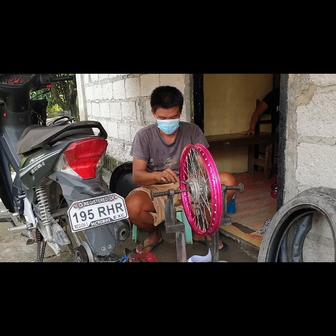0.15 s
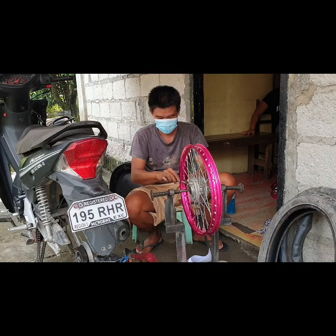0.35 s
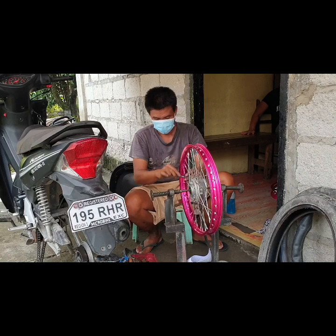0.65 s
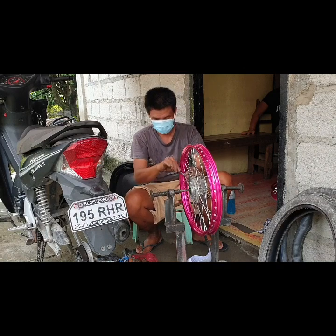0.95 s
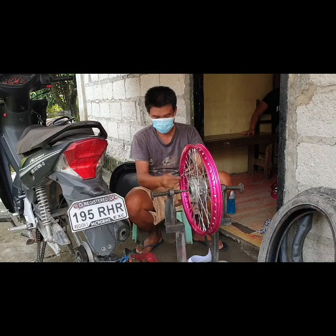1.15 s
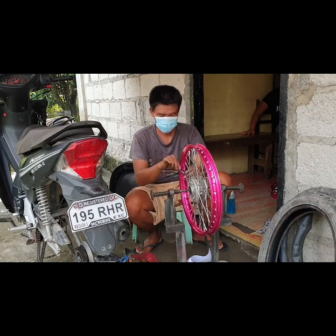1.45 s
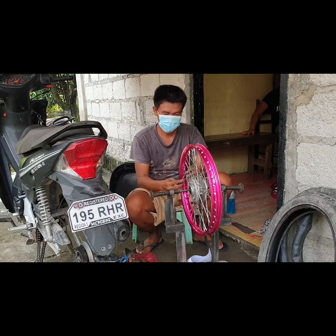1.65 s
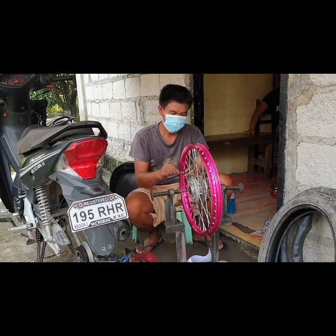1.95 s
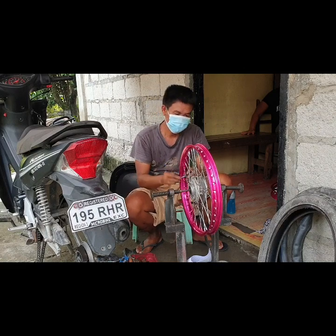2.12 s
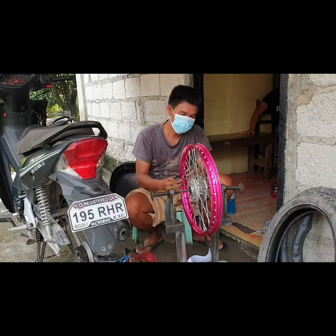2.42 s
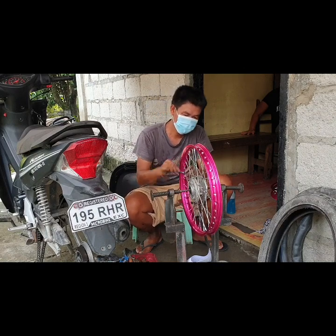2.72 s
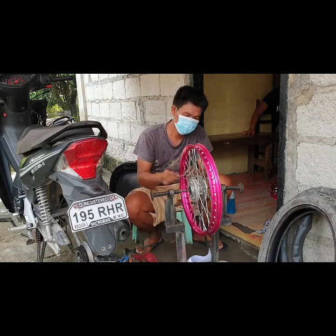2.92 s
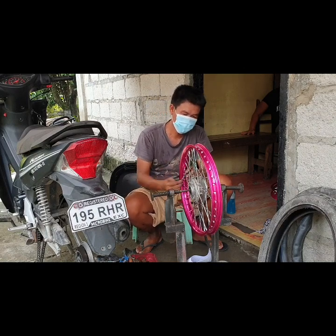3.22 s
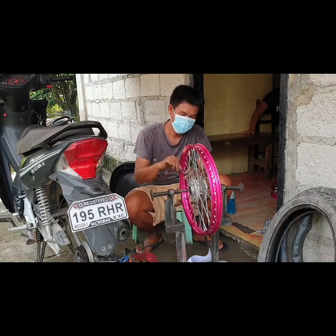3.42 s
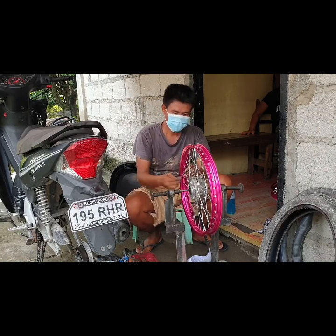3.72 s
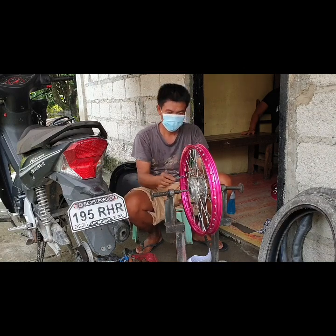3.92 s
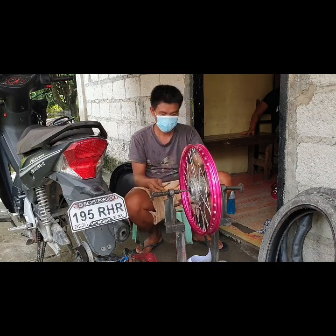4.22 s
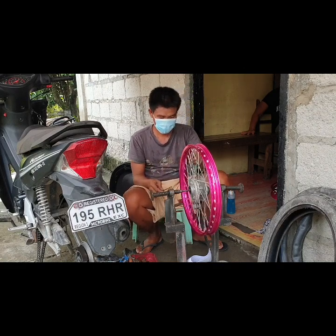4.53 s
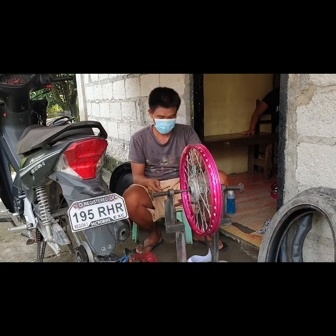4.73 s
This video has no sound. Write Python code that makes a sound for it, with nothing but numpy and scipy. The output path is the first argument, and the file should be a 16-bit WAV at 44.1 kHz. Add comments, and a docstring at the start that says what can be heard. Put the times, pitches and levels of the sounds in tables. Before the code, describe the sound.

Steel spokes clink and knock against a wheel rim, ringing briefly, while a small engine throbs down the street and fades.

```python
"""A steel tool and loose spokes clink and knock on a motorcycle wheel being laced in a doorway.
Each contact cracks and rings the rim and the whole web of spokes; single spokes sing on, beating,
and the loose ones tremble in their holes. Down the street a single-cylinder engine throbs, one
boom and puff per firing, and fades away. Behind it lie rumble, traffic and a thin hiss;
far off, birds hoot and whistle."""
import sys
import numpy as np
from scipy import signal
from scipy.fft import rfft, irfft, next_fast_len
from scipy.io import wavfile
from scipy.ndimage import map_coordinates

SR = 44100
rng = np.random.default_rng(int(sys.argv[2]) if len(sys.argv) > 2 else 0)


def dump_mix(stems):
    """Bounce the given channels to the path in sys.argv[1] as a 16-bit WAV at rate SR."""
    frames = np.atleast_2d(stems).T  # one column per channel
    limited = np.clip(frames, -1, 1)  # hard clip at full scale
    pcm = np.round(limited * 32767).astype(np.int16)
    wavfile.write(sys.argv[1], SR, pcm)


N = 214612
TOP_HZ = 15750  # top of the mix

# Light contacts that each ring a spoke: loose spokes clinking together, and the tool touching, seating on a
# nipple or rebounding: t/s, level/dB, rim clank/dB, brightness/dB, spoke note f/Hz, note level/dB
CLINKS = [(0.07, -34, -9, 13, 6196, -44), (0.2019, -46, -12, 6, 3084, -68),
          (.403, -44.5, -5.5, 16, 2770, -58), (.425, -33.5, -10.5, 14.5, 7350, -37),
          (0.477, -35, -13.5, 6, 3084, -45), (0.5593, -51, -2, 10, 3084, -58),
          (.612, -38, 1.5, 7, 1650, -50.5), (1.019, -46.5, -15, 11, 2310, -70),
          (1.09, -43.5, -3.5, 11, 1674, -45), (1.421, -37.5, -3, 10, 2150, -51),
          (1.505, -39.5, -3, 9.5, 4306, -56), (1.543, -39, -0.5, 7.5, 2200, -50),
          (1.834, -43, 0.5, 12.5, 2770, -48), (1.984, -39, 1.5, 11, 2760, -45),
          (2.2482, -40.5, 1, 9, 1790, -48), (2.6369, -35, -0.5, 10, 2353, -42),
          (2.648, -39.5, -0.5, 9, 2350, -39), (3.033, -36.5, -3, 13, 2340, -38),
          (3.058, -38, 1, 4, 2494, -42), (3.188, -37, 5, 4.5, 2354, -39),
          (3.4424, -37, 3.5, 10.5, 2656, -38), (3.479, -37.5, -3, 9, 2304, -42),
          (4.059, -38.5, -5, 10, 1570, -40), (4.0895, -35.5, -6.5, 9, 5500, -32.5),
          (4.5112, -60, 1, 17.5, 5431, -62)]
# Tool on rim: the six columns of CLINKS, then short clank f/Hz, short clank level/dB
KNOCKS = [(1.1202, -39, -4.5, 5, 2180, -38.5, 1740, -25), (1.9451, -33.5, -5, 4.5, 3493, -46, 1840, -39),
          (2.2175, -46, 7, 9.5, 2790, -42, 1990, -28.5), (2.341, -33.5, -4, 5.5, 1763, -29, 1880, -17),
          (2.358, -36.5, 4, -1, 1827, -29.5, 1800, -25), (2.3904, -32, 1, 4.5, 1763, -31, 1820, -15.5),
          (2.6151, -42.5, 2, 9, 1671, -50, 1680, -28), (2.7232, -29, -3.5, 4, 1827, -25.5, 1910, -20.5),
          (2.7828, -37, 5.5, 6.5, 2353, -27.5, 1890, -25), (3.0186, -43.5, 7.5, 9, 1671, -33.5, 1680, -34),
          (3.1294, -30.5, -4, 7, 4312, -28.5, 1820, -20), (3.148, -39.5, 7, 5, 1827, -31.5, 1800, -23),
          (3.552, -33.5, -0.5, -2, 1794, -33.5, 1890, -22.5), (3.572, -37, 5, 0, 3720, -38, 1600, -27),
          (3.6008, -32, -1, 2, 2304, -27.5, 1774, -16), (3.6112, -45, 8, -3, 1836, -40, 2490, -24)]
# The tool grazes a spoke or slips: t/s, level/dB, brightness/dB
TICKS = [(0.167, -52.5, 5.5), (.322, -57, -2), (.59, -51, 0), (0.964, -53, 5), (1.010, -50, 5),
         (1.066, -46, 6), (1.350, -57.5, -11), (1.372, -54.5, 4), (1.392, -47.5, 1), (1.634, -55.5, 3),
         (1.732, -58.5, 2), (1.8037, -51, 5.5), (1.826, -57, 13), (1.9156, -46.5, 12), (2.311, -41, 8.5),
         (2.706, -38, 12), (3.105, -40.5, 10), (3.431, -49, -2), (3.531, -39.5, 10.5), (4.05, -51.5, 6)]


def contacts(clink_crack_db=-9.5, knock_crack_db=-7.5, tick_crack_db=-10.5, tick_clank_db=-6):
    """Cue list of every steel-on-steel hit: t/s, level/dB, rim clank/dB, brightness/dB, crack/dB."""
    clinks = [(*row[:4], clink_crack_db) for row in CLINKS]
    knocks = [(*row[:4], knock_crack_db) for row in KNOCKS]
    ticks = [(s, db, tick_clank_db, bright_db, tick_crack_db) for s, db, bright_db in TICKS]
    return clinks + knocks + ticks


# The wheel's clearest modes: f/Hz, relative level/dB, t60/s
RIM_MODES = [(1131, -8, 0.25), (1404, -1.5, 0.28), (1668, 8.5, 0.13), (1755, 12.5, 0.059),
             (1822, -2, 0.079), (2260, 0, 0.11), (2305, -10, 0.35), (2460, -16, 0.5), (2675, -4, 0.32),
             (2778, -1.5, 0.18), (3490, 6, 0.087), (3660, -2, 0.18), (3850, -9, 0.17), (4290, 2.5, 0.098),
             (4560, -3.5, 0.12), (5320, -2.5, 0.088), (6200, 1, 0.088)]
# Tone of the crowd of weaker spoke modes: f/Hz, relative level/dB
WEB_TONE = [(300, -62), (750, -10), (1150, 0.5), (1400, 5.5), (1780, 5), (2050, 5.5), (2450, 7),
            (3600, 3.5), (5000, 0), (6300, -2), (8400, -9), (10800, -4), (13000, -6.5), (15500, -11)]
# Ring time of the web of spokes: f/Hz, t60/s
WEB_DECAY = [(800, 0.22), (2500, 0.28), (5500, 0.22), (14700, 0.18)]


def wheel(rim_db=-8, jingle_db=-1.2, wash_db=-0.5, crack_db=7, crack_t60=0.026, rise_s=0.0033):
    """Every contact cracks, then rings the rim and 200 spoke modes; the doorway blurs them to a wash."""
    out, t = np.zeros((2, N)), np.arange(SR * 2 // 5) / SR
    rims = struck_modes(*np.transpose(RIM_MODES), t, scatter_db=3)
    web_hz = np.linspace(1300, TOP_HZ, 200) + 15 * rng.standard_normal(200)
    web_db = along(WEB_TONE, web_hz)
    web_db -= 10 * np.log10(np.sum(amp(web_db) ** 2) / 2)  # to unit power
    jingles = struck_modes(web_hz, web_db, along(WEB_DECAY, web_hz), t, scatter_db=5.5)
    groups_hz = np.arange(2500, TOP_HZ, 280)
    for (s, db, clank_db, bright_db, hard_db), rim, jingle in zip(contacts(), rims, jingles):
        ring = amp(rim_db) * rim + amp(jingle_db) * jingle + amp(wash_db) * wash(len(t))
        ring *= 1 - np.exp(-t / rise_s)  # the blow takes a moment to spread through the web
        chatter = unit(amp(4 * wobble(470, len(t))))  # steel bounces several times within one contact
        crack = amp(crack_db + hard_db - 60 * t / crack_t60) * chatter * steel_noise(len(t))
        # a blow on the rim clanks low; a glancing touch on a spoke is bright
        tilt = [(700, 0), (1150, clank_db), (1850, clank_db), (2500, 1.5), (5000, 1.5),
                (9000, bright_db)]
        # each point of contact favours its own groups of high modes
        groups_db = 2.5 * rng.standard_normal(len(groups_hz))
        colour = lambda hz: amp(along(tilt, hz) + np.interp(hz, groups_hz, groups_db, left=0))
        add(out, s, amp(db) * filtered(ring + crack, colour))
    return out


def struck_modes(hz, db, t60, t, scatter_db):
    """One stereo ring per contact: the same damped modes, struck at new strengths and phases."""
    modes = np.exp(2j * np.pi * hz[:, None] * t) * amp(db[:, None] - 60 * t / t60[:, None])
    hits = len(contacts())
    size = (hits, 2, len(hz))
    hit_db = scatter_db * rng.standard_normal((hits, 1, len(hz)))
    ear_db = 2 * rng.standard_normal(size)
    strength = unit(amp(hit_db + ear_db)) * np.exp(2j * np.pi * rng.random(size))
    return (strength.reshape(-1, len(hz)) @ modes).real.reshape(hits, 2, -1)


def steel_noise(size):
    """Stereo noise in the tone of the spokes."""
    return unit(filtered(rng.standard_normal((2, size)), lambda hz: amp(along(WEB_TONE, hz))))


def wash(size, grit_db=3):
    """The blurred tail of a hit: gritty noise in which each frequency dies at its own speed."""
    grit = unit(steel_noise(size) * amp(grit_db * wobble(413, size)))
    hz, t, spectrum = signal.stft(grit, SR, nperseg=256)
    decay = amp(-60 * t / along(WEB_DECAY, hz)[:, None])
    return signal.istft(spectrum * decay, SR, nperseg=256)[1][:, :size]


def clanks(t60=0.018, rise_s=0.0011, wall_lag_s=0.0178, wall_db=-6.5):
    """Each knock sends a short, hollow clank from the rim, and a wall slaps it back."""
    out, t = np.zeros((2, N)), np.arange(SR // 12) / SR
    envelope = amp(-60 * t / t60) * (1 - np.exp(-t / rise_s))
    for s, *_, hz, db in KNOCKS:
        direct, echo = amp(db) * envelope * np.sin(2 * np.pi * (hz * t + rng.random((2, 1))))
        add(out, s, direct)
        add(out, s + wall_lag_s, amp(wall_db) * echo)
    return out


# Spokes left free to ring on: t/s, f/Hz, level/dB, t60/s
FREE_SPOKES = [(.478, 3100, -52, 0.63), (.612, 2460, -46, 0.32), (.612, 2988, -50, 0.38),
               (2.7234, 2360, -38, .25), (2.7828, 2353, -35, 0.23), (2.7828, 1378, -32, .2),
               (3.188, 2353, -42, 0.18), (3.6005, 2490, -36, 0.22), (3.6005, 2692, -53.5, 0.66),
               (3.6005, 3100, -44, .42), (3.6005, 3343, -51, 0.64), (3.6005, 3850, -33, 0.15),
               (4.0905, 1510, -51.5, .65), (4.0905, 3050, -61, 0.44)]


def spoke_notes(loose_t60_cycles=820, knocked_t60=0.18, split_hz=9, rise_s=0.001):
    """Each clink and knock rings a spoke, which swings in planes of slightly unequal pitch and beats."""
    out, t = np.zeros((2, N)), np.arange(SR // 2) / SR
    loose = [(s, hz, db, loose_t60_cycles / hz) for s, *_, hz, db in CLINKS]
    knocked = [(s, hz, db, knocked_t60) for s, _, _, _, hz, db, _, _ in KNOCKS]
    for s, hz, db, t60 in loose + knocked + list(FREE_SPOKES):
        detune_hz = split_hz * np.array([[-1], [0], [1]]) * rng.uniform(0.55, 1.5, (3, 1))
        planes = np.exp(2j * np.pi * (hz + detune_hz) * t)
        swing = np.array([0.45, 1, 0.45]) * np.exp(2j * np.pi * rng.random((2, 3)))
        envelope = amp(db - 60 * t / t60) * (1 - np.exp(-t / rise_s))
        add(out, s, envelope * (swing @ planes).real)
    return out


def shiver(ticks_per_s=160, t60=0.52):
    """Loose spokes keep trembling in their holes: many tiny ticks, each with a short ring."""
    t = np.arange(SR // 3) / SR
    ticks = (rng.random(N) < ticks_per_s / SR) * rng.standard_normal(N)
    snap = 1 + 2 * np.exp(-t / 0.0063)
    ring = rng.standard_normal((2, len(t))) * amp(-60 * t / t60) * snap
    trembling = signal.fftconvolve(ticks[None], ring, axes=1)[:, :N]
    # f/Hz, relative level/dB
    tone = [(1000, -17), (1600, 4.5), (2400, 3.5), (3100, 3.5), (4500, -1), (8000, -16), (15000, -42)]
    return unit(filtered(trembling, lambda hz: amp(along(tone, hz)))) * agitation()


def agitation(hand_db=-58, hand_end_s=0.83, hand_fade_s=0.18, send_db=-21, t60=0.78):
    """How hard the loose spokes tremble: steadily under the hand at first, and fading after each hit."""
    t = np.arange(N) / SR
    hand = amp(hand_db) * np.clip(1 - (t - hand_end_s) / hand_fade_s, 0, 1)
    energy = hand ** 2
    fade = amp(send_db - 60 * t[:SR] / t60)
    for s, db, *_ in contacts():
        add(energy, s, (amp(db) * fade) ** 2)
    return np.sqrt(energy)


# Engine speed: t/s, firing rate/Hz
FIRING_RATE = [(0, 26), (.12, 25.5), (.25, 23.6), (.4, 24.25), (2.2, 24.15), (2.7, 24.5), (2.9, 24.3),
               (3.3, 25), (3.8, 26), (4.4, 23), (4.87, 22.6)]
# Exhaust boom, shifting as it moves off between the walls: t/s, level/dB, centre f/Hz, half width/Hz
BOOM = [(0.05, -45.5, 145, 21), (.4, -41, 132, 32), (0.57, -37.5, 136, 16), (.76, -39.5, 137, 32),
        (1.03, -38, 128, 29), (1.37, -40, 131, 8.8), (1.6, -51, 123, 15), (1.78, -44.5, 123, 13),
        (2.14, -39, 134.6, 26), (2.38, -42, 142, 7.4), (2.66, -51.5, 146, 6.7), (2.86, -50.5, 117, 10),
        (3.2, -58, 135, 17), (3.48, -47.5, 155, 5.8), (3.8, -60, 154, 18), (4.08, -52.5, 138, 38),
        (4.8, -65, 120, 40)]
# Tone of the exhaust's overtones: f/Hz, relative level/dB
OVERTONE_TONE = [(215, -18), (243, 2), (268, 4), (292, 2), (318, -3.5), (345, -7.5), (375, -15.5),
                 (410, -23), (445, -14.5), (500, -19), (600, -31)]
# Fader of those overtones: t/s, level/dB
OVERTONE_FADER = [(0.05, -62), (0.6, -51), (1.4, -52.5), (2.1, -58.5), (2.5, -53), (2.9, -59), (3.67, -71),
                  (4.8, -69)]
# Tone of the exhaust's turbulence: f/Hz, relative level/dB
PUFF_TONE = [(60, -16), (110, 6.5), (170, 1), (230, -13), (330, -12.5), (500, -27), (900, -43.5)]


def engine(puff_db=-13, uneven_db=0.56, start_cycle=0.31):
    """Every firing of the single cylinder gives a low boom, wavering overtones and a turbulent puff."""
    (firing_hz,), (overtone_db,) = curves(FIRING_RATE), curves(OVERTONE_FADER)
    boom_db, centre_hz, width_hz = curves(BOOM)
    cycles = start_cycle + np.cumsum(firing_hz) / SR
    low, high = np.arange(3, 9), np.arange(9, 23)  # harmonic numbers
    resonance_db = -20 * np.log10(1 + ((low[:, None] * firing_hz - centre_hz) / width_hz) ** 2)
    boom = harmonics(cycles, low, resonance_db, drift_db=2.36, blur_rad=0.66)
    boom *= amp(uneven_db * wobble(24))
    tone_db = along(OVERTONE_TONE, high[:, None] * firing_hz)
    overtones = harmonics(cycles, high, tone_db, drift_db=5.5, blur_rad=0.35)
    puffs = unit(stereo_noise(PUFF_TONE) * (1 + np.cos(2 * np.pi * cycles)))
    return (boom + amp(puff_db) * puffs) * amp(boom_db) + overtones * amp(overtone_db)


def harmonics(cycles, numbers, db, drift_db, blur_rad):
    """Multiples of the firing rate, summed to rms 1; each drifts in strength and phase."""
    gain = amp(db + drift_db * np.array([wobble(4.43) for _ in numbers]))
    phase = 2 * np.pi * numbers[:, None] * cycles + blur_rad * np.array([wobble(7) for _ in numbers])
    return np.sum(gain * np.cos(phase), axis=0) / np.sqrt(np.sum(gain ** 2, axis=0) / 2)


# Tones of the four street beds: f/Hz, relative level/dB
RUMBLE_TONE = [(15, -35), (30, -32), (48, -6.5), (65, 1), (90, -1), (130, -6.5), (190, -13.5), (240, -15),
               (320, -23.5), (500, -27.5), (1000, -62)]
DRONE_TONE = [(110, -45), (165, -3.5), (190, -5.5), (225, -11), (330, -18.5), (600, -48)]
TRAFFIC_TONE = [(100, -1.5), (250, 2), (350, 1.5), (520, -4), (750, -9), (1100, -11.5), (1800, -16.5),
                (3500, -24), (8000, -61)]
HISS_TONE = [(500, -20), (1500, -2), (3000, -3), (4100, -2.5), (5100, 2), (6000, -1.5), (7000, -5),
             (9000, -13), (13000, -11.5), (15700, -14)]
# Fader of the low drone: t/s, level/dB
DRONE_FADER = [(0, -44), (.3, -44.5), (.8, -51.5), (1.5, -53.5), (2.7, -63), (2.97, -49.5), (3.3, -51),
               (3.7, -73), (4.87, -71)]
# Fader of the traffic's murmur: t/s, relative level/dB
TRAFFIC_FADER = [(0.1, -59.5), (0.61, -57), (0.71, -57), (2.17, -65), (2.64, -63), (4.2, -67.5), (4.6, -60),
                 (4.8, -62)]


def street(rumble_db=-48, traffic_trim_db=7, hiss_db=-68):
    """Low rumble, a swelling drone, distant traffic and a thin outdoor hiss."""
    (traffic_db,), (drone_db,) = curves(TRAFFIC_FADER), curves(DRONE_FADER)
    rumble = amp(rumble_db + 1.1 * wobble(7.8)) * stereo_noise(RUMBLE_TONE)
    drone = amp(drone_db) * stereo_noise(DRONE_TONE)
    traffic = amp(traffic_db + traffic_trim_db + 3.2 * wobble(6.5)) * stereo_noise(TRAFFIC_TONE)
    return rumble + drone + traffic + amp(hiss_db) * stereo_noise(HISS_TONE)


# Far hoots and whistles: t/s, length/s, start f/Hz, end f/Hz, relative level/dB, hoarseness/share of f
BIRD_CALLS = [(.97, .24, 735, 720, -61, .02), (1.38, .22, 580, 560, -61, .025),
              (2.46, .26, 740, 725, -62, .022), (3.18, .34, 546, 536, -56.5, .017),
              (4.37, .18, 1420, 1330, -67, .018), (4.68, .19, 3680, 3350, -68, .011),
              (4.67, .14, 4500, 4330, -73, .014)]


def birds(echo_t60=0.37, direct_gain=0.5, echo_gain=0.55):
    """Falling, slightly hoarse calls, heard directly and by way of the walls along the street."""
    calls = np.zeros(N)
    for s, length, start_hz, end_hz, db, hoarse in BIRD_CALLS:
        progress = np.linspace(0, 1, int(length * SR))
        glide_hz = start_hz + (end_hz - start_hz) * progress
        pitch_hz = glide_hz * (1 + hoarse * wobble(110, len(progress)))
        swell = np.sqrt(np.abs(np.sin(np.pi * progress))) * amp(3 * wobble(60, len(progress)))
        add(calls, s, amp(db) * unit(swell * np.sin(2 * np.pi * np.cumsum(pitch_hz) / SR)))
    t = np.arange(SR // 2) / SR
    walls = rng.standard_normal((2, len(t))) * amp(-60 * t / echo_t60)
    echo = signal.fftconvolve(calls[None], walls / np.linalg.norm(walls[0]), axes=1)[:, :N]
    return direct_gain * calls + echo_gain * echo


# Stereo image of the street beds and puffs: f/Hz, left-right correlation
STEREO_IMAGE = [(60, 1), (130, 0.87), (290, 0.53), (640, 0.44), (1400, 0), (5000, 0)]


def stereo_noise(tone):
    """Noise of rms 1 in the given tone, centred in the bass and wide in the treble."""
    def mid_side(hz):
        angle = np.arccos(np.clip(along(STEREO_IMAGE, hz), -1, 1)) / 2
        return amp(along(tone, hz)) * [np.cos(angle), np.sin(angle)]
    mid, side = filtered(rng.standard_normal((2, N)), mid_side)
    return unit(np.array([mid + side, mid - side]))


def amp(db):
    """Decibels to gain."""
    return 10 ** (np.asarray(db) / 20)


def unit(x):
    """x scaled to rms 1."""
    return x / np.sqrt(np.mean(x ** 2) + 1e-20)


def along(points, hz):
    """Read (f/Hz, value) points on a log frequency axis."""
    knots_hz, values = np.transpose(points)
    return np.interp(np.log(hz + 1), np.log(knots_hz + 1), values)


def curves(rows):
    """One value per sample for each column after the time."""
    s, *columns = np.transpose(rows)
    return [np.interp(np.arange(N) / SR, s, column) for column in columns]


def wobble(rate, size=N):
    """A smooth random curve, rate knots a second."""
    knots = rng.standard_normal(int(size * rate / SR) + 4)
    return map_coordinates(knots, [np.arange(size) * rate / SR])


def filtered(x, response):
    """x through an EQ whose gain is response(hz)."""
    size = x.shape[-1]
    padded = next_fast_len(size + SR // 10)
    return irfft(rfft(x, padded) * response(np.fft.rfftfreq(padded, 1 / SR)), padded)[..., :size]


def add(track, s, sound):
    """Mix a sound into the track at s seconds."""
    part = track[..., max(round(s * SR), 0):][..., :sound.shape[-1]]
    part += sound[..., :part.shape[-1]]


def scene():
    """The wheel in front, the street behind."""
    return wheel() + clanks() + spoke_notes() + shiver() + engine() + street() + birds()


def record(dry):
    """A brick-wall high cut on the whole mix."""
    return filtered(dry, lambda hz: hz < TOP_HZ)


dry = scene()
out = record(dry)
dump_mix(out)
```